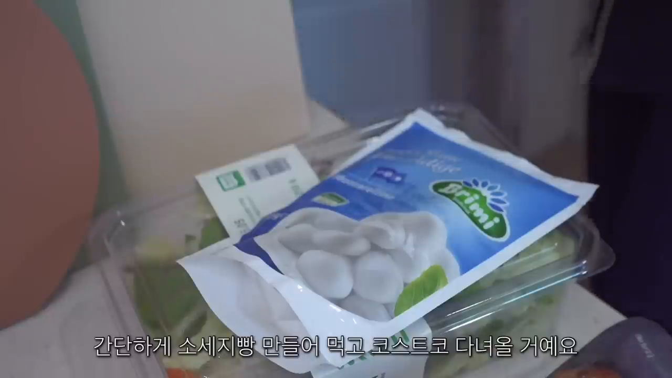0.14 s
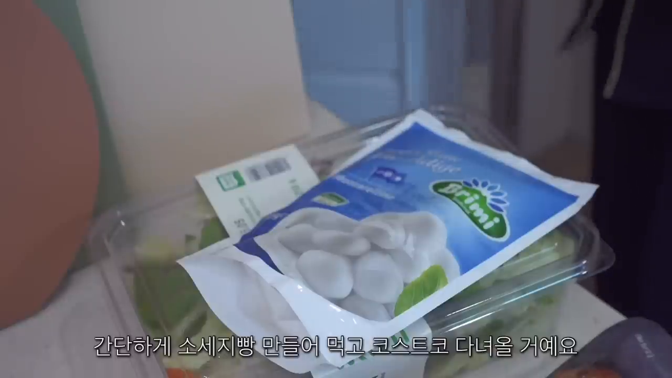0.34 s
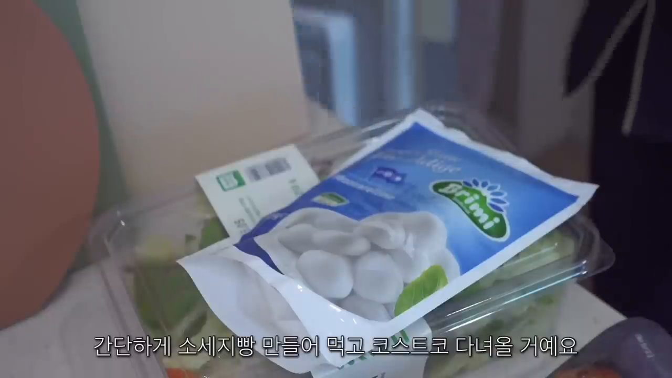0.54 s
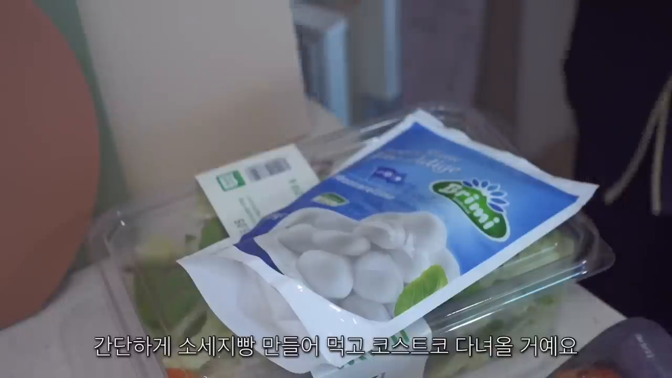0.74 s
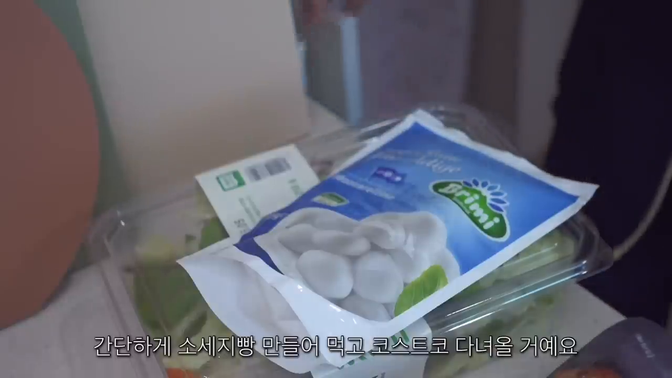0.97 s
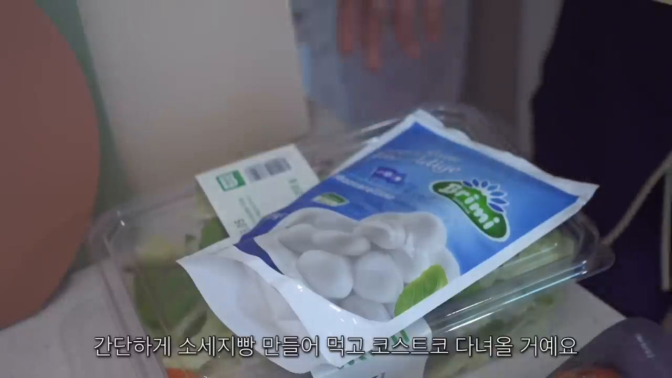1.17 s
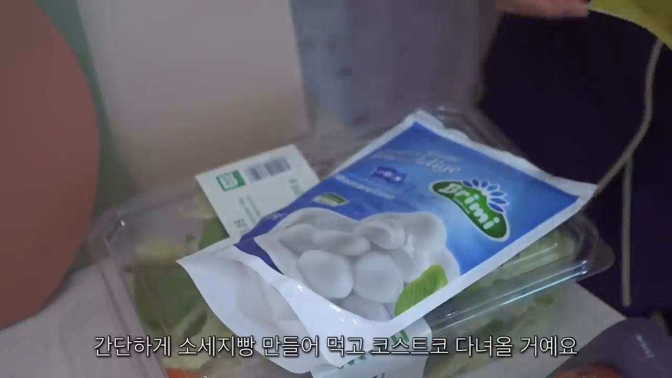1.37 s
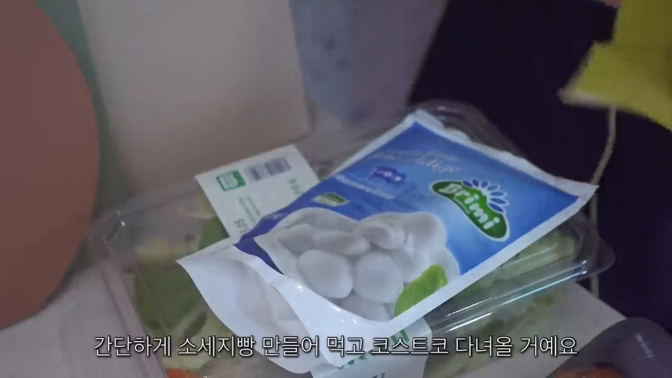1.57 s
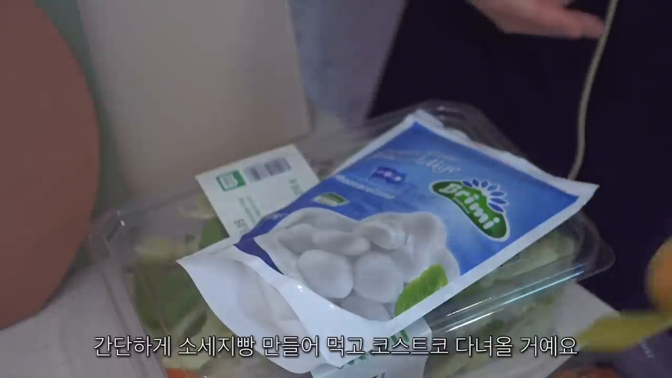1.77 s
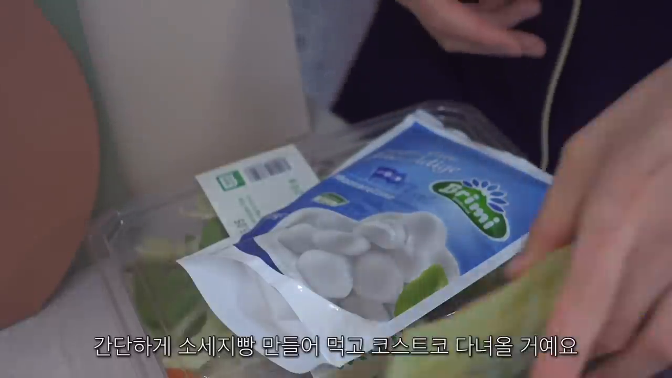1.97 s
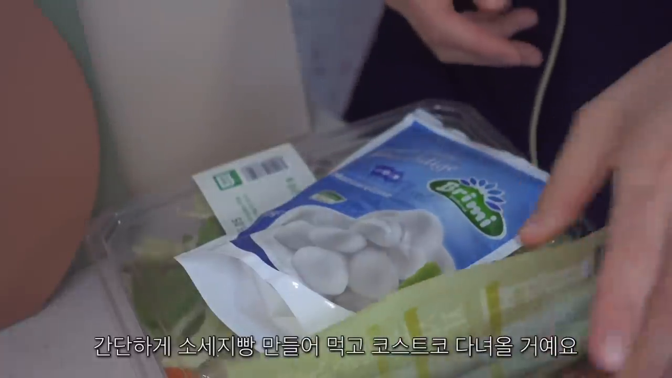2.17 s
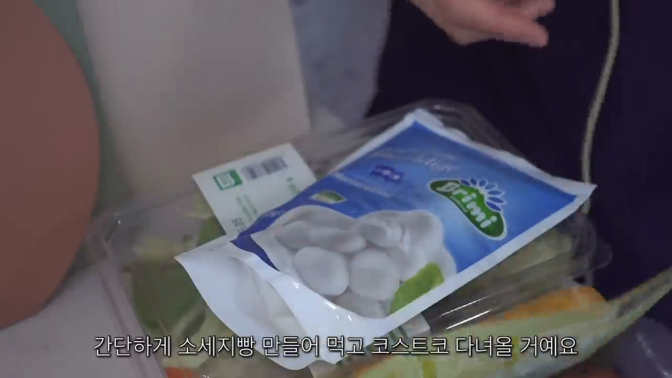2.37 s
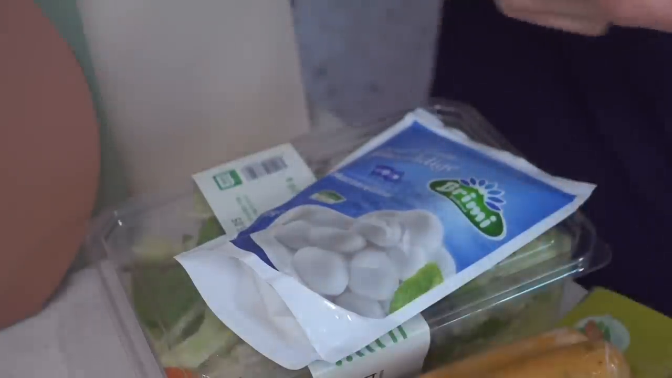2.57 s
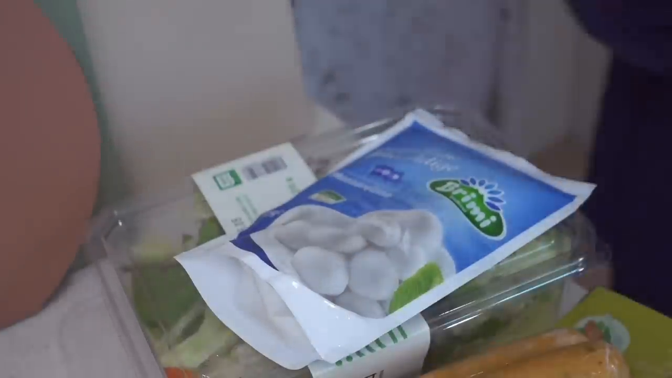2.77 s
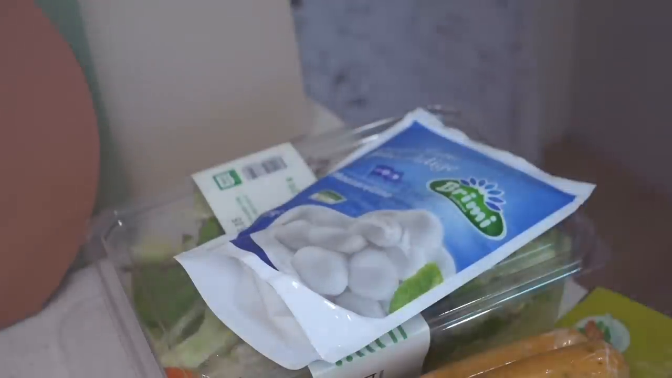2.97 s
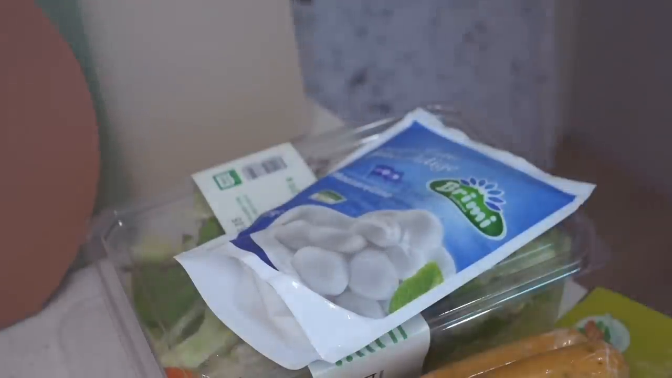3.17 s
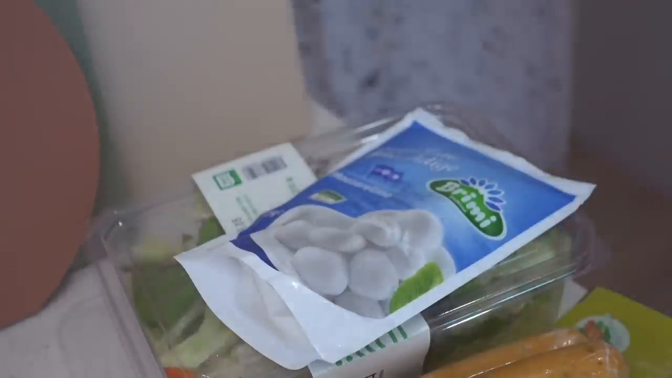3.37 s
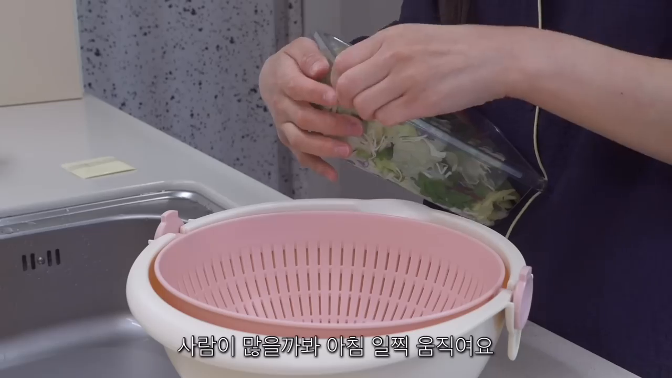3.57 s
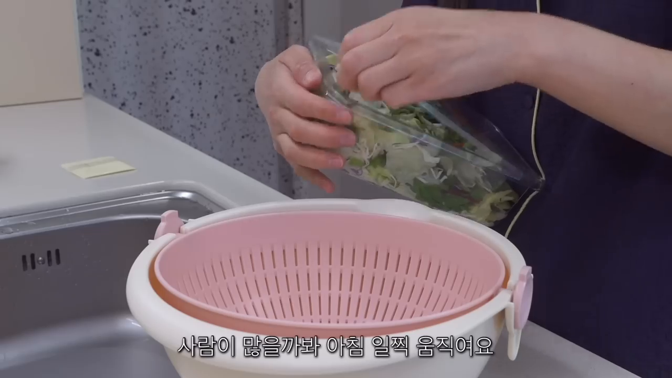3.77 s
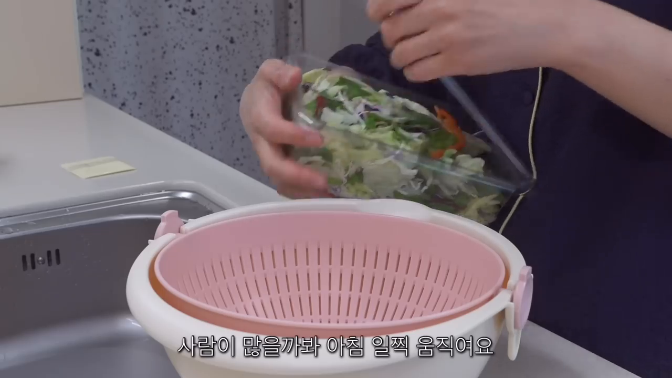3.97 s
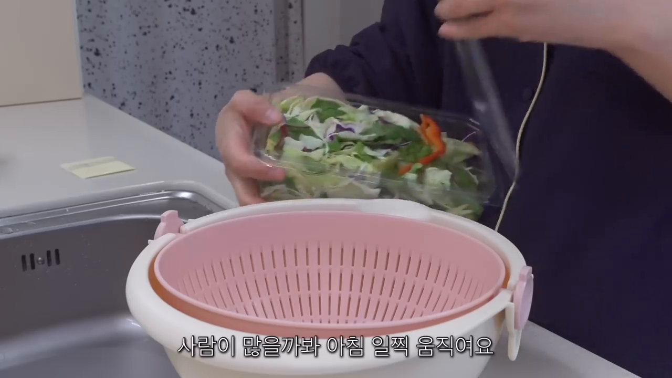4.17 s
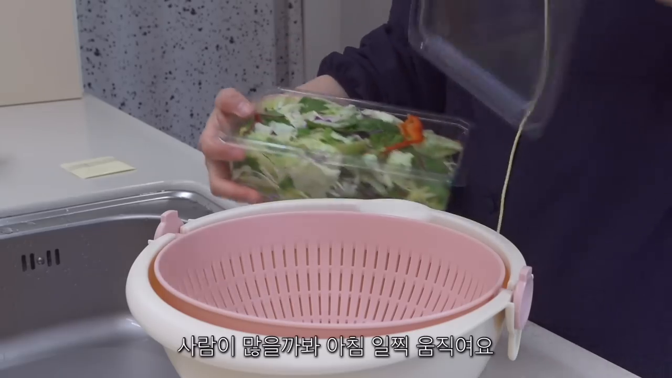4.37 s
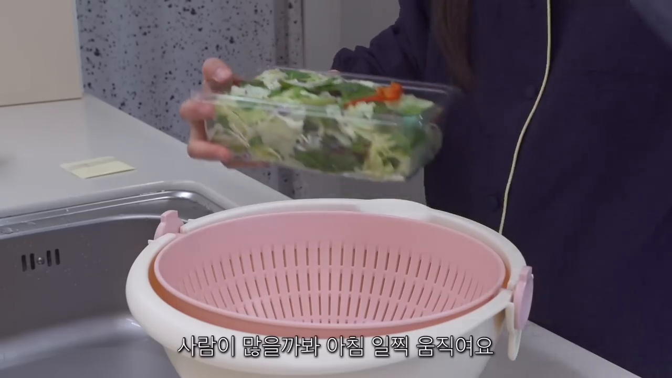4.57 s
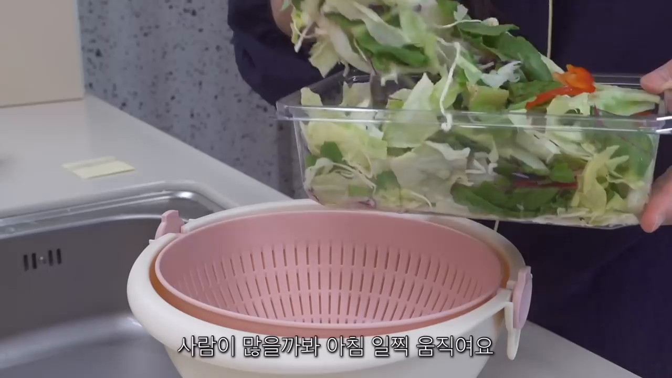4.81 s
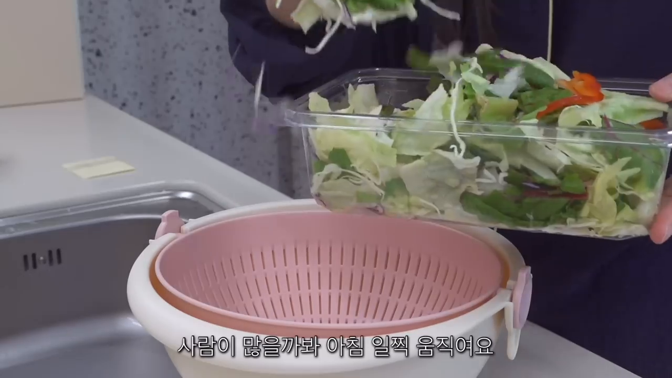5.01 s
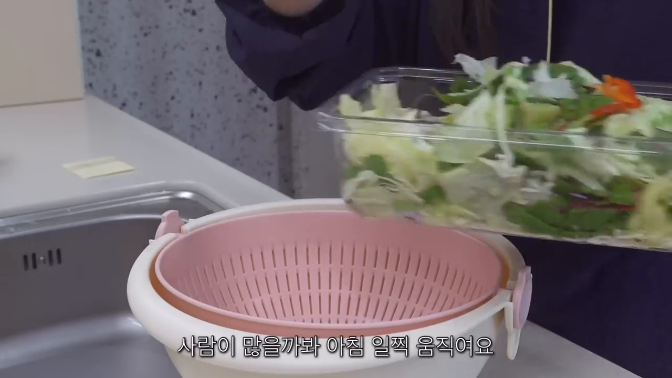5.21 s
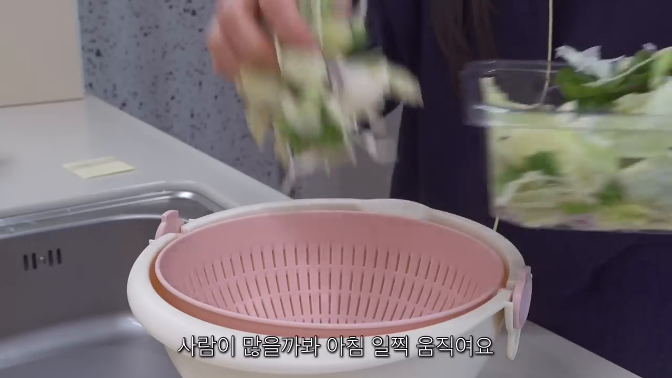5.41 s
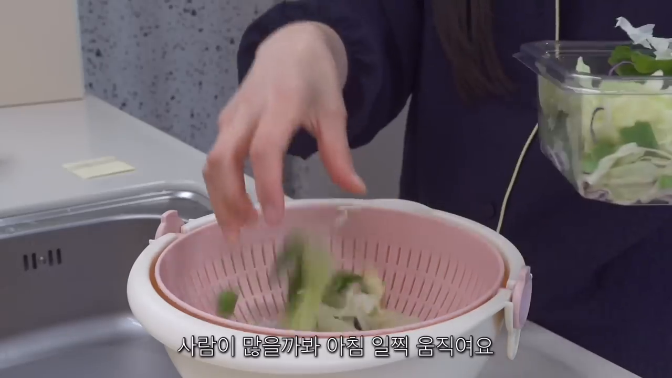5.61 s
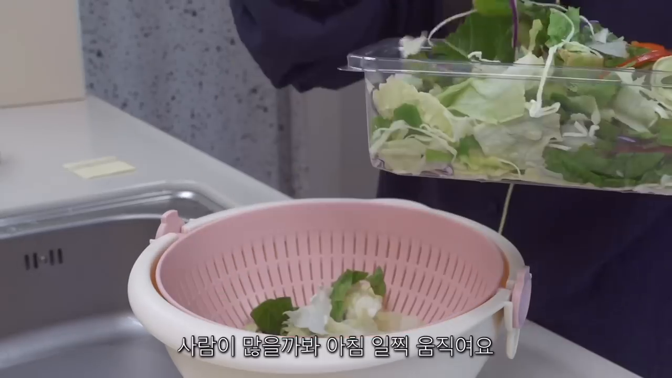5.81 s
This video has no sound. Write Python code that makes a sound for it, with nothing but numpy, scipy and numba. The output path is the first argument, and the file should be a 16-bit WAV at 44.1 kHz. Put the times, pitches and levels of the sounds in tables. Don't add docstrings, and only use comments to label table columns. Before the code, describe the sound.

Groceries are unpacked close to a camera microphone: light packaging crackle, a wooden cupboard thud with rebounds, a harsh burst of crumpling film, and a second slap soon after. Then, at the sink, a thin clear lid snaps and buckles open, fine bright crackles continue, and salad leaves land in a colander with a crunchy thump. Short hard-room reflections, low airy hiss.

```python
import sys
import numpy as np
from scipy import signal
from scipy.fft import rfft, irfft
from scipy.io import wavfile
from scipy.ndimage import uniform_filter1d
from numba import njit

SR = 44100
rng = np.random.default_rng(int(sys.argv[2]) if len(sys.argv) > 2 else 0)


def undo_db(level):
    steps = np.asarray(level, float) / 20
    return 10 ** steps


def wav_record(signal):
    frames = np.transpose(np.atleast_2d(signal))
    bounded = np.clip(frames, -1, 1)
    quanta = np.round(bounded * 32767).astype(np.int16)
    wavfile.write(sys.argv[1], SR, quanta)


N = 257984
T = np.arange(N) / SR
CUT_S = 3.45


def on_log(hz, table):
    row_hz, value = np.transpose(table)
    return np.interp(np.log(hz), np.log(row_hz), value)


def shaped(x, gain):
    n = x.shape[-1]
    hz = np.maximum(np.arange(n // 2 + 1) * SR / n, 1)
    return irfft(rfft(x) * gain(hz), n)


def highpass(x, order, hz):
    return signal.sosfilt(signal.butter(order, hz, "high", fs=SR, output="sos"), x)


def walk(rate_hz):
    k = int(SR / rate_hz)
    held = np.repeat(rng.standard_normal(N // k + 1), k)
    return 0.49 * uniform_filter1d(uniform_filter1d(held, k), k)[:N]


@njit
def rings(n, start, hz, decay, size, phase, rise):
    y = np.zeros(n)
    for g in range(len(hz)):
        turn = np.exp(2j * np.pi * hz[g] / SR - decay[g])
        z = size[g] * np.exp(1j * phase[g])
        closed, shrink = 1., np.exp(-rise[g])
        for i in range(max(int(start[g]), 0), min(int(start[g] + 6.9 / decay[g]), n)):
            closed *= shrink
            y[i] += z.imag * (1 - closed)
            z *= turn
    return y


def creases(s, hz, db, cycles, phase):
    hz = np.clip(hz, 40, 0.4 * SR)
    decay = hz / SR / np.clip(cycles, 0.3, 40)
    return rings(N, s * SR, hz, decay, undo_db(db + 4.5) * np.sqrt(decay), phase, 1.69 * decay)


def crackle(count=110000, sizes=16):
    u = rng.random((count, 5))
    s = u[:, 0] * N / SR
    at = (s * SR).astype(int)
    hz = 250 * 64 ** np.sqrt(u[:, 1])
    colour_db = -11 * np.clip(np.log2(580 / hz), 0, 9)
    colour_db -= 5 * np.log10(16 * u[:, 1] + 0.02)
    cluster_db = 4.7 * walk(90)[at]
    patches = np.array([walk(55) for _ in range(sizes)])
    cluster_db += 2.8 * patches[(sizes * np.sqrt(u[:, 1])).astype(int), at]
    rare_db = np.minimum(-3.3 * np.log(1 - u[:, 2]), 19)
    lift_db = lift(s, hz)
    cycles = (0.99 + 3.55 * u[:, 3]) * (hz / 2000) ** 0.086 * undo_db(2.4 * lift_db)
    db = handling(s, hz) + colour_db + cluster_db + rare_db + lift_db - 1.2
    return creases(s, hz, db, cycles, 2 * np.pi * u[:, 4])


def handling(s, hz):
    # peak_s, peak_db, swell_ms, fade_ms, brightest_hz
    pack_rustles = [(0.005, -37.5, 50, 240, 5300), (0.037, -27.5, 9.5, 150, 3950),
                    (.055, -32, 27, 110, 2500), (.356, -40.5, 98, 280, 2960), (.47, -44.5, 100, 150, 8000),
                    (.712, -40, 17, 52, 1180), (.762, -57, 14, 120, 2300), (.775, -52, 65, 140, 1290),
                    (.8, -44, 120, 1700, 1500), (0.93, -36.5, 140, 170, 8500), (1.097, -54, 59, 200, 2900),
                    (1.249, -32.5, 127, 100, 5470), (1.295, -25, 71, 90, 1970), (1.61, -14.5, 56, 80, 3500),
                    (1.652, -22.5, 57, 38, 3000), (1.662, -24, 8, 35, 6000), (1.754, -28, 6.8, 140, 3100),
                    (1.77, -27.5, 40, 41, 8000), (1.845, -41.5, 90, 100, 2800), (1.981, -36, 6, 60, 2000),
                    (2.002, -28, 46, 35, 2800), (2.039, -7.5, 12, 39, 7040), (2.047, -3.5, 22, 40, 4500),
                    (2.051, -3, 24, 140, 2401), (2.075, -7, 40, 70, 1550), (2.085, -16, 50, 60, 4280),
                    (2.09, -16.5, 40, 55, 9000), (2.112, -19, 33, 208, 1790),
                    (2.41, -36.5, 3500, 1050, 2600), (2.494, -13, 64, 30, 2400), (2.505, -40, 60, 86, 900),
                    (2.502, -11.5, 22, 7.4, 1620), (2.463, -16, 6.5, 23, 7000),
                    (2.499, -13.5, 32, 22, 11000), (2.535, -18, 30, 77, 9400), (2.58, -31, 10, 60, 8000),
                    (2.615, -45, 250, 750, 1700), (2.94, -44, 63, 88, 7060)]
    tub_rustles = [(3.46, -48, 230, 385, 7000), (3.565, -36, 35, 150, 1290), (3.664, -32.5, 91, 350, 4420),
                   (3.788, -36.5, 97, 60, 5960), (3.803, -13, 4.7, 64, 3100), (3.834, -22, 62, 140, 480),
                   (3.884, -11.5, 11, 68, 5900), (3.903, -34, 34, 70, 3940), (4.032, -29.5, 23, 150, 6300),
                   (4.11, -29.5, 40, 130, 7600), (4.13, -34, 51, 304, 2200), (4.19, -27.5, 810, 238, 6600),
                   (4.25, -30, 970, 69.6, 5300), (4.323, -28, 13, 110, 7700), (4.325, -35, 8, 90, 1200),
                   (4.409, -40, 79, 325, 6800), (4.764, -33, 31, 504, 9040), (4.81, -44.5, 60, 450, 4100),
                   (4.853, -43, 11, 150, 2600), (4.888, -47, 10, 120, 1100), (5.016, -48, 8, 80, 1100),
                   (4.95, -46, 210, 200, 6000), (5.081, -43.5, 220, 198, 5500), (5.142, -44, 17, 90, 2840),
                   (5.153, -35.5, 10, 110, 3600), (5.26, -49, 300, 597, 4770), (5.47, -34.5, 49, 400, 7940),
                   (5.58, -13, 32, 60.3, 6100), (5.597, -24.5, 18, 70, 3500), (5.636, -26.5, 82, 245, 4800),
                   (5.845, -42, 120, 100, 5000)]
    # peak_s, peak_db, swell_ms, fade_ms, brightest_hz
    door_rattles = [
        (1.33, -1.5, 3, 27, 4020),
        (1.331, -4, 4.1, 56, 2100),
        (1.338, -11, 10, 43, 1500),
        (1.35, -13.5, 20, 240, 800),
        (1.345, -15, 20, 188, 4300),
        (1.435, -25.5, 28, 41, 6100),
    ]
    swing_db = 30
    below_db_oct = 6
    power = 1e-9
    for table, above_db_oct in (pack_rustles + tub_rustles, 4.5), (door_rattles, 9.5):
        for peak_s, db, swell_ms, fade_ms, bright_hz in table:
            ms = 1000 * (s - peak_s)
            octaves = np.log2(hz / bright_hz)
            shape_db = swing_db * np.where(ms < 0, ms / swell_ms, -ms / fade_ms)
            colour_db = np.where(octaves < 0, below_db_oct * octaves, -above_db_oct * octaves)
            power = power + undo_db(db + shape_db + colour_db) ** 2
    return 10 * np.log10(power)


def lift(s, hz):
    # hz, width_octaves, lift_db
    packs = [(888, 0.1, 2), (1700, 0.35, 4), (3010, 0.23, 1), (4306, 0.1, 1), (6120, 0.19, 2.5)]
    tub_walls = [(2090, 0.6, 2.65), (2580, 0.027, 3.7), (3550, 0.015, 3.3), (4500, 0.02, 2.7),
                 (5900, 0.023, 2.9), (8230, 0.44, 1.3)]

    def hills(table):
        return sum(db * np.exp(-(np.log2(hz / peak_hz) / width) ** 2) for peak_hz, width, db in table)

    return np.where(s < CUT_S, hills(packs), hills(tub_walls))


def body_level(db_at_500, hz):
    return db_at_500 - 12 * np.log2(hz / 500)


def snaps():
    # start_s, peak_db, ring_hz, edge_rel_db
    pack_snaps = [(0.035, -24.5, 2010, -23.5), (0.043, -23.5, 2330, -27), (0.459, -42, 3960, -13),
                  (0.701, -27.5, 1440, -64), (0.715, -28, 1440, -68), (0.728, -24.5, 1230, -58),
                  (1.284, -20, 1740, -34.5), (1.3288, -8.5, 1280, -38), (1.433, -33, 876, -30),
                  (1.66, -19.5, 2090, -11.5), (1.846, -30, 3140, -46), (2.001, -29, 2850, -21.5),
                  (2.029, -29.5, 6070, -13.5), (2.03, -23.5, 2470, -3.5), (2.0525, 1.5, 1830, -35),
                  (2.068, -10, 1500, -20), (2.096, -4, 1950, -17), (2.462, -14.5, 1390, -30),
                  (2.478, -33, 2040, -43), (2.486, -18, 970, -28), (2.5, -3.5, 1614, -15),
                  (2.535, -39, 1647, -11), (2.581, -54, 1620, -13), (2.654, -28.5, 5840, -14)]
    tub_snaps = [(3.55, -49.5, 1412, 4.5), (3.64, -24.5, 4100, -23.5), (3.765, -29.5, 3400, -22.5),
                 (3.781, -31, 6950, -4), (3.799, -26, 9700, 1.5), (3.8027, -18.5, 2000, -12),
                 (3.9756, -31, 6580, -5), (4.002, -32, 5850, -13.5), (4.041, -33.5, 5600, -14),
                 (4.096, -37, 7140, -1), (4.323, -24.5, 8670, -13), (4.396, -37, 5930, -9),
                 (4.714, -37, 7950, -23), (4.763, -30.5, 8200, -16), (4.8085, -25, 8700, -10),
                 (4.851, -30.5, 4000, -20), (4.884, -34, 955, -24), (4.967, -32, 6700, -34),
                 (5.013, -44, 1260, -16), (5.1403, -23, 5000, -19.5), (5.1507, -21.5, 4970, -18.5),
                 (5.245, -41.5, 4270, -20), (5.322, -46, 6600, -18), (5.469, -34.5, 5060, -9.5),
                 (5.506, -32.5, 7100, -11.5), (5.558, -27, 4660, -22.5), (5.581, -12.5, 7400, -11),
                 (5.5909, -8, 4480, -16.5), (5.739, -37.5, 4860, -29)]
    s, db, hz, edge_db = np.transpose(pack_snaps + tub_snaps)
    flurry = swarm(s, db, hz, body_level(-22, hz), edge_db, flurry_ms=1.1, crack_db=8.5, cycles=2.06, gather=0.12)
    return flurry + creases(s, hz, db + 6.5, 3.0, 0 * hz)


def squeezes():
    # start_s, peak_db, ring_hz, flurry_ms
    squeezed = [(0.351, -38.5, 1560, 3.5), (0.757, -28, 1476, 9.6), (1.086, -32, 2420, 6.1),
                (1.232, -28.5, 2040, 5.9), (1.574, -16.5, 4320, 17), (1.597, -20.5, 2950, 4.9),
                (1.6, -30.5, 953, 6.8), (1.613, -19, 4700, 4.7), (1.748, -26.5, 2923, 12),
                (1.976, -27.5, 1845, 6), (2.503, -39, 1102, 4.4), (3.861, -26.5, 6180, 8.7),
                (3.879, -16, 5740, 4.7), (4.175, -24, 4470, 3.9), (5.131, -27.5, 7900, 2),
                (5.57, -12, 4520, 9)]
    s, db, hz, ms = np.transpose(squeezed)
    flurry = swarm(s, db, hz, body_level(11.5, hz), -23, flurry_ms=ms, crack_db=-4, cycles=5.5, gather=0.21)
    return undo_db(1) * flurry


def swarm(s, db, hz, body_db, edge_db, flurry_ms, crack_db, cycles, gather, count=100, first=14):
    columns = (np.reshape(c, (-1, 1)) for c in (s, db, hz, body_db, edge_db, flurry_ms))
    s, db, hz, body_db, edge_db, flurry_ms = columns
    u = rng.random((len(s), count, 6))
    late_s = 2.2 * u[..., 0] - 0.44 * np.log(1 - u[..., 4])
    late_s = late_s * np.clip(flurry_ms, 0.3, 40) / 1000
    u[:, :first, 1] = (np.arange(first) + u[:, :first, 1]) / first
    u[:, :first, 2:] = [0.46, 0.2, 0, 1]
    late_s[:, :first] = 0
    gathered_hz = hz * 1.284 ** (u[..., 1] - 0.5)
    pitch_hz = np.where(u[..., 5] < gather, gathered_hz, 300 * 52 ** u[..., 1])
    octaves = np.log2(pitch_hz / hz)
    down = np.clip(-octaves / np.maximum(np.log2(hz / 500), 0.5), 0, 1.5) * (body_db + 1.1)
    up = np.clip(octaves / np.maximum(np.log2(11000 / hz), 0.5), 0, 1.2) * (edge_db + 11.9)
    energy_db = db + down + up - 2 * np.log(1 - u[..., 2]) - 1.5 + lift(s, pitch_hz)
    energy_db[:, :first] += crack_db
    phase = 2 * np.pi * u[..., 3]
    return creases((s + late_s).ravel(), pitch_hz.ravel(), energy_db.ravel(), cycles, phase.ravel())


def pops():
    # start_s, peak_db, pitch_hz, t60_ms
    pack_pops = [(0.703, -39, 1620, 25), (0.717, -35, 1040, 25), (0.763, -38, 1080, 32),
                 (0.783, -41, 1030, 50), (0.789, -40, 1620, 30), (1.09, -37, 1534, 55),
                 (1.12, -44, 1570, 50), (1.118, -46.5, 2650, 40), (1.095, -50.5, 3200, 60),
                 (1.569, -36, 3470, 20), (1.585, -30, 4260, 20), (1.601, -28, 2797, 22),
                 (1.602, -32.5, 950, 49), (1.616, -31, 980, 34), (1.618, -16, 4720, 10),
                 (1.618, -26, 2180, 30), (1.63, -21, 3300, 15), (1.637, -31.5, 2600, 10),
                 (1.647, -40, 1410, 10), (1.654, -31, 2980, 8.6), (1.66, -25, 2010, 30),
                 (1.662, -28, 1100, 13), (1.671, -37, 1800, 22), (1.661, -16.5, 3700, 8.8),
                 (1.752, -29.5, 2820, 25), (1.778, -31, 3200, 20), (2.06, -31.5, 378, 54),
                 (2.069, -7, 3070, 25), (2.11, -36, 353, 116), (2.07, -11.5, 1450, 19),
                 (2.075, -12, 1696, 18), (2.0959, -4.5, 2580, 4.1), (2.142, -25.5, 1526, 33),
                 (2.085, -15.5, 1880, 13), (2.052, -2.5, 3110, 12), (2.096, -4, 3640, 13),
                 (2.112, -15, 2600, 14), (2.126, -22, 1670, 25), (2.46, -22.5, 870, 30),
                 (2.467, -23, 1370, 21), (2.477, -20, 2000, 13), (2.487, -20.5, 895, 46),
                 (2.495, -12, 2720, 20), (2.5013, -12, 1570, 11), (2.5, -14, 2610, 7),
                 (2.508, -20, 841, 43), (2.513, -13, 1980, 18), (2.535, -25, 3200, 10),
                 (2.545, -29, 1680, 20), (2.563, -29, 2150, 17)]
    tub_pops = [(3.556, -45.5, 558, 120), (3.646, -41, 350, 41), (3.803, -32, 2045, 44),
                (3.827, -24, 386, 35), (3.838, -28.5, 700, 30), (3.856, -26, 390, 14),
                (3.885, -31, 433, 21), (3.824, -22.5, 1530, 17), (3.832, -21.5, 469, 46),
                (3.846, -24, 502, 30), (3.872, -32.5, 680, 32), (3.884, -30, 2110, 36),
                (3.905, -34, 490, 27), (3.862, -24, 5900, 20), (3.883, -17, 5770, 11),
                (3.893, -22, 5900, 31), (4.0315, -32, 6700, 4), (4.127, -30, 8200, 5.4),
                (4.25, -36, 7000, 4), (3.899, -22, 3350, 19), (4.033, -38, 463, 47),
                (4.042, -26, 5200, 5.5), (4.18, -25, 4560, 26), (4.111, -42, 1930, 47),
                (4.224, -43, 1290, 40), (4.322, -36, 2160, 25), (4.05, -38.5, 604, 26),
                (4.77, -51.5, 2630, 84), (4.775, -36, 6530, 9.9), (4.778, -57, 3550, 120),
                (4.782, -41, 8900, 12), (4.814, -40, 6500, 10), (4.833, -37, 8600, 25),
                (4.851, -42, 2560, 33), (4.883, -46, 2100, 9.8), (4.885, -42, 1300, 14),
                (4.886, -48, 740, 9.9), (4.9, -42, 8700, 10), (4.948, -47, 1800, 20),
                (4.967, -41, 6770, 12), (5.013, -42.5, 920, 17), (5.02, -49, 1400, 19),
                (5.578, -46, 705, 40), (5.5897, -18.5, 4500, 3.1), (5.597, -22, 4600, 9.2),
                (5.605, -30, 1450, 44), (5.674, -47, 650, 40), (5.632, -38, 686, 45), (5.646, -42, 770, 60),
                (5.684, -42, 2290, 30), (5.703, -50, 750, 56), (5.74, -39, 1930, 15), (5.762, -48, 796, 48)]
    door_pops = [
        (1.3285, -19, 1600, 25),
        (1.329, -16, 1870, 22),
        (1.329, -11, 1296, 15),
        (1.329, -16.5, 560, 25),
        (1.329, -17, 192, 102),
        (1.336, -18.5, 926, 40),
        (1.341, -20, 900, 20),
        (1.344, -22.5, 203, 60),
        (1.348, -24, 760, 30),
    ]
    s, db, hz, ms = np.transpose(pack_pops + door_pops + tub_pops)
    decay = np.log(1000) * 1000 / (np.clip(ms, 3, 300) * SR)
    return rings(N, s * SR, hz, decay, undo_db(db), 0 * s, 5.7 * decay)


def struck(blows, modes):
    s, db, ms = (c[:, None] for c in np.transpose(blows))
    hz, mode_db, t60_s = np.transpose(modes)
    u = rng.standard_normal((len(s), len(hz), 3))
    size = undo_db(db + mode_db + 0.75 * u[..., 0]) * np.sign(u[..., 2])
    size = size / (1 + (hz * ms / 1500) ** 2)
    start = s * SR + 0 * hz
    detuned_hz = hz * (1 + 0.06 * u[..., 1])
    decay = np.log(1000) / (t60_s * SR) + 0 * s
    rise = 3000 / (ms * SR) + 0 * hz
    parts = start, detuned_hz, decay, size, 0 * size, rise
    return rings(N, *(part.ravel() for part in parts))


def thuds():
    # start_s, blow_db, contact_ms
    door_blows = [(.36, -57, 3.2), (.78, -61, 5), (1.329, -24, 0.53), (1.337, -25.5, 8.9), (1.352, -20, 4),
                  (1.375, -31, 2.3), (1.41, -33.5, 1.7), (1.46, -27.5, 5.7), (1.6, -52, 6),
                  (2.054, -47, 3.4), (2.1, -49, 1.4), (2.5, -61, 8)]
    tub_blows = [
        (3.55, -82, 0.78),
        (3.64, -51, 1.9),
        (3.802, -42, 1.3),
        (3.826, -31.5, 2.7),
        (3.89, -45, 0.66),
        (4.035, -51, 0.81),
    ]
    colander_blows = [
        (5.588, -20, 9.7),
        (5.61, -43, 1),
        (5.64, -41.5, 2.3),
        (5.665, -50, 0.82),
        (5.69, -52, 0.87),
    ]
    # pitch_hz, level_db, t60_s
    door_modes = [(66, -22.5, 0.52), (92.3, -11.5, 0.1), (123.3, -12.5, 0.38), (159, -9, 0.1),
                  (198, -4.5, 0.096), (293, -4.5, 0.073), (415, -6.5, 0.14), (580, -2, 0.12),
                  (745, -10, 0.074), (948, -27, 0.11)]
    tub_modes = [(110, -25.5, 0.24), (276, -8.5, 0.1), (200, -16.5, 0.14), (461, 5.5, 0.073),
                 (620, 6, 0.099), (840, -3, 0.06)]
    colander_modes = [(138, -24, 0.29), (268, -6, 0.037), (670, -6, 0.14), (734, -4.5, 0.2),
                      (1450, 0, 0.036)]
    return struck(door_blows, door_modes) + struck(tub_blows, tub_modes) + struck(colander_blows, colander_modes)


def spread(mid, side):
    # pitch_hz, side_minus_mid_db
    side_db = [(100, -18), (400, -12), (2000, -8), (12000, -7.5)]
    side = shaped(side, lambda hz: undo_db(on_log(hz, side_db)))
    return np.array([mid + side, mid - side])


def kitchen(x, count=4):
    # band_hz, t60_s, wet_db
    bands = [(148, 0.18, -19.5), (390, 0.34, 2), (970, 0.28, -1), (2038, 0.26, -2.5), (4640, 0.17, -2),
             (9700, 0.19, -0.5)]
    log_hz = np.log([row[0] for row in bands])
    t = T[:int(0.7 * SR)]
    tails = 0
    for k, (_, t60_s, wet_db) in enumerate(bands):
        only_k = np.arange(len(bands)) == k
        fade = np.exp(-np.log(1000) * t / t60_s) * np.clip((t - 0.0015) / 0.005, 0, 1)
        fade *= undo_db(wet_db) / np.sqrt(np.sum(fade ** 2))
        noise = rng.standard_normal((count, 2, len(t)))
        tails = tails + shaped(noise, lambda hz: np.sqrt(np.interp(np.log(hz), log_hz, only_k))) * fade
    wet = 0
    for k in range(count):
        turn = np.sqrt(np.clip(1 - np.abs((T * 60 - k) % count - 1), 0, 1))
        wet = wet + signal.fftconvolve((x * turn)[None], spread(*tails[k]), axes=1)[:, :N]
    return wet


def air():
    # pitch_hz, density_db
    hiss_colour = [(30, -62), (121, -19.5), (280, -5), (1860, -2), (3060, -10), (10800, -16),
                   (14800, -20.5), (16000, -46.5)]
    # time_s, level_db
    hiss_level = [(0, -56), (2.6, -55.5), (3.4, -58), (3.5, -55), (5.85, -60.5)]
    # pitch_hz, width_hz, pile_db, sink_db
    hum = [(57.9, 14, -93.5, -92), (120, 40, -78, -90), (247, 210, -87.5, -106), (1800, 200, -69, -81)]
    mid, side = shaped(rng.standard_normal((2, N)), lambda hz: undo_db(on_log(hz, hiss_colour)))
    level_db = np.interp(T, *np.transpose(hiss_level)) + 0.083 * walk(1.6)
    noise = spread(mid, side * undo_db(3.5)) / mid.std() * undo_db(level_db)
    for hz, width_hz, pile_db, sink_db in hum:
        drone = shaped(rng.standard_normal(N), lambda f: 1 / (1 + (2 * (f - hz) / width_hz) ** 2))
        noise = noise + drone / drone.std() * undo_db(np.where(T < CUT_S, pile_db, sink_db))
    return noise


def scene():
    # time_s, left_minus_right_db
    pan_path = [(0, -1), (1, -0.5), (2, 0.85), (3.4, -1.5), (3.5, 1.5), (5.85, 1.5)]
    film = highpass(crackle() + snaps() + squeezes(), 4, 500)
    near = film + highpass(thuds(), 2, 55)
    panels = highpass(pops(), 2, 250)
    direct_db = np.where(T < CUT_S, 2.5, 4.0)
    direct = undo_db(direct_db) * (near + panels)
    reflected = kitchen(near + undo_db(-2.5) * panels)
    pan_db = np.interp(T, *np.transpose(pan_path))
    return (direct + reflected) * undo_db(np.array([pan_db, -pan_db]) / 2) + air()


def band_limit(x):
    return signal.sosfilt(signal.butter(12, 16230, fs=SR, output="sos"), x)


def record(dry):
    clipped = np.clip(dry * undo_db(-1.2), -1, 1)
    dulled = shaped(clipped, lambda hz: 1 / (1 + (hz / 15950) ** 120))
    return band_limit(dulled)


dry = scene()
out = record(dry)
wav_record(out)
```